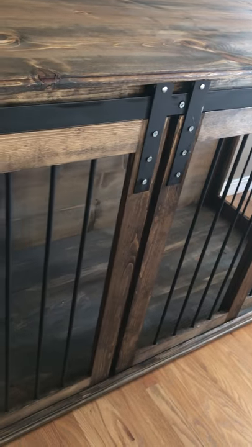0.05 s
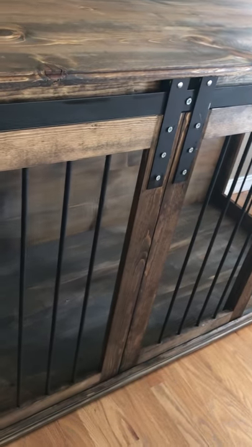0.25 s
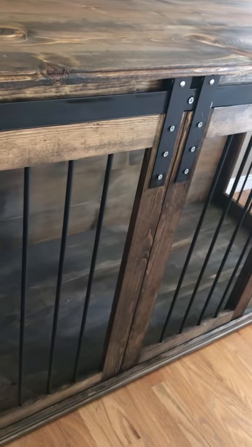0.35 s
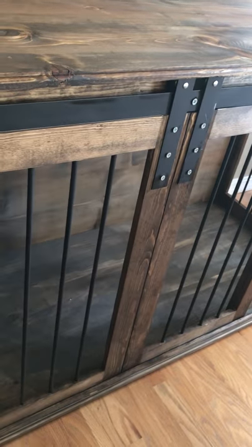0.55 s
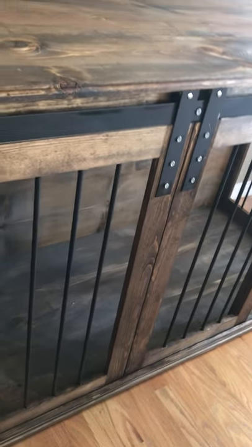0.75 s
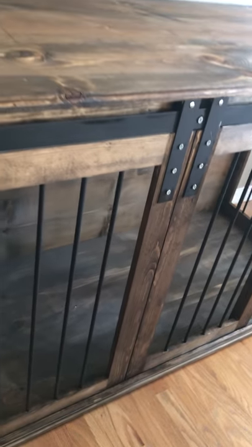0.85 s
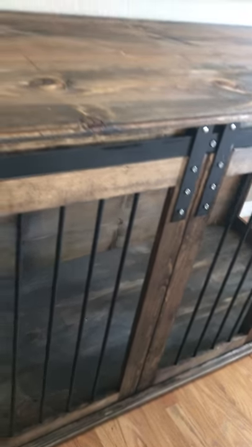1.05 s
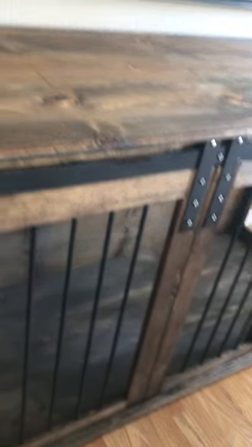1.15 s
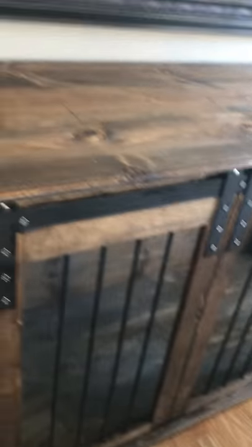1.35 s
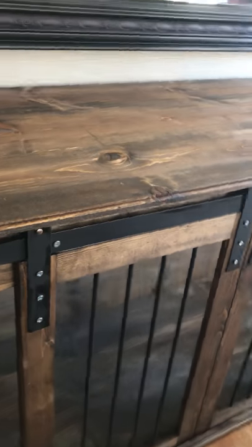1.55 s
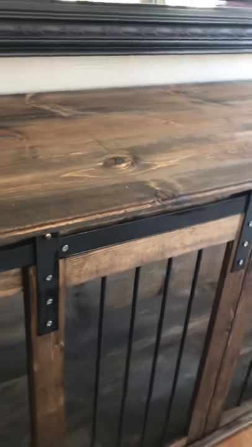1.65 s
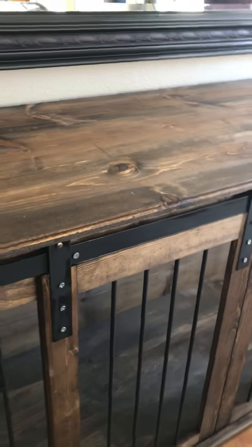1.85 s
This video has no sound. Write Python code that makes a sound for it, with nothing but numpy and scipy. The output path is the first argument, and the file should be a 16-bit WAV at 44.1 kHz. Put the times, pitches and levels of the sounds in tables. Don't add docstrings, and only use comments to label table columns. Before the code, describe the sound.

A wooden sliding cabinet door rolls on a steel rail, gritty crunch swelling from 0 to 0.3 s. Steel touches at 0.29, then a loud wood-and-iron clack at 0.35 and a brighter one at 0.4, booming hollowly. A rebound knocks in a quick cluster around 0.58. Loose metal ticks at 0.77, 0.93, 1.1, 1.27 and 1.5 fade over a faint bar hum, room tone and hiss.

```python
import sys
import numpy as np
from scipy import signal
from scipy.fft import rfft, irfft, next_fast_len
from scipy.io import wavfile
from scipy.ndimage import uniform_filter1d, map_coordinates

SR = 44100
rng = np.random.default_rng(int(sys.argv[2]) if len(sys.argv) > 2 else 0)


def nominal_scale(level):
    x = np.asarray(level, float) / 20
    return 10 ** x


def waveform_to_disk(signal):
    frames = np.transpose(np.atleast_2d(signal))
    scaled = np.clip(frames, -1, 1) * 32767
    samples = np.round(scaled).astype(np.int16)
    wavfile.write(sys.argv[1], SR, samples)


N = 83790

# (frequency [Hz], level per Hz [dB])
BODY_COLOUR = [(25, -7), (70, 1), (130, -1), (190, 2.5), (300, -5), (480, -14), (900, -15.5), (1500, -57)]
# (frequency [Hz], level [dB], t60 [s])
STRAP_MODES = [(742, 1, 0.51), (945, -2, 0.15), (1234, 0, 0.11), (1570, -41, 5.0), (1976, 3.5, 0.12),
               (2650, -38, 0.18), (3000, -44, 0.75), (3730, -11, 0.09), (4270, -32, 0.18),
               (5040, -20, 0.11), (6083, -65, 0.25), (7730, -9, 0.095)]
# (frequency [Hz], level [dB], t60 [s])
HANGER_RING = [(690, -12, .2), (1095, -3, .3), (1287, 0, .3), (1413, -2, .3), (1798, -12, .1),
               (2350, -10, .08), (3100, -16, .08), (3625, -8, .06)]
DOOR_RING_DB, DOOR_RING_S = -23, .08
HANGER_RING_S = .16


def unit(x):
    return x / np.sqrt(np.mean(x ** 2) + 1e-20)


def along(points, hz):
    f, v = np.transpose(points)
    return np.interp(np.log(hz + 1), np.log(f + 1), v)


def curve(rows):
    return np.interp(np.arange(N) / SR, *np.transpose(rows))


def wobble(rate):
    knots = rng.standard_normal(int(N * rate / SR) + 4)
    return map_coordinates(knots, [np.arange(N) * rate / SR])


def filtered(x, response):
    m = next_fast_len(len(x) + 8192)
    return irfft(rfft(x, m) * response(np.fft.rfftfreq(m, 1 / SR)), m)[:len(x)]


def noise(response):
    return unit(filtered(rng.standard_normal(N), response))


def peak(f, hz, width_hz):
    return 1j * f * width_hz / (hz * hz - f * f + 1j * f * width_hz)


def room_answer():
    # (frequency [Hz], t60 [s])
    decay = [(100, 0.93), (500, 0.9), (2000, 0.53), (6000, 0.35), (14000, 0.12)]
    late_db, early_db, early_t60_s, early_top_hz = -3, -4, 0.044, 9100
    hz, t, z = signal.stft(rng.standard_normal(SR), SR, nperseg=256)
    late = signal.istft(z * nominal_scale(-60 * t / along(decay, hz)[:, None]), SR, nperseg=256)[1]
    early = filtered(rng.standard_normal(len(late)), lambda f: 1 / (1 + (f / early_top_hz) ** 2))
    early = early * nominal_scale(-60 * np.arange(len(late)) / SR / early_t60_s)
    answer = nominal_scale(late_db) * late / np.linalg.norm(late) + nominal_scale(early_db) * early / np.linalg.norm(early)
    answer[0] = 1
    return answer


def travelling(dry, until_s):
    t, step_s = np.arange(N) / SR, .05
    wet = 0
    for s in np.arange(0, until_s, step_s):
        share = np.cos(np.pi / 2 * np.clip((t - s) / step_s, -1, 1))
        wet = wet + signal.fftconvolve((dry * share)[:SR // 2], room_answer())[:N]
    return np.pad(wet, (0, N - len(wet)))


def chatter_burst(shape, colour):
    even_hz = 160
    z, hz = rfft(shape * rng.standard_normal(len(shape))), np.fft.rfftfreq(len(shape), 1 / SR)
    power = uniform_filter1d(np.abs(z) ** 2, size=round(even_hz / hz[1]))
    even = z / np.sqrt(np.abs(power) + 1e-12)
    burst = irfft(even * colour(hz), len(shape))
    burst = burst * (np.arange(len(shape)) < len(shape) // 2)
    return unit(burst) * np.sqrt(np.mean(shape ** 2))


def strikes(events, colour, modes, ring_db, longest_s):
    focus_db, focus_width, rise_s = -0.5, 0.36, 0.00041
    snap, snap_t60_s = .8, .01
    out, t = np.zeros(N + 3 * SR), np.arange(SR // 2) / SR
    for s, db, tilt_db, chatter_s, focus_hz in events:
        def lean(f):
            focus = 1 + nominal_scale(focus_db) * abs(peak(f, focus_hz, focus_width * focus_hz))
            return nominal_scale(tilt_db * np.log2((f + 200) / 2500)) * focus

        shape = nominal_scale(-60 * t / max(chatter_s, .002)) + snap * nominal_scale(-60 * t / snap_t60_s)
        crack = chatter_burst(shape, lambda f: nominal_scale(along(colour, f)) * lean(f))
        ring = 0
        for hz, level_db, t60 in modes:
            decay = nominal_scale(level_db + rng.normal(0, 2.1) - 60 * t / min(t60, longest_s))
            ring = ring + decay * lean(hz) * np.sin(2 * np.pi * (hz * t + rng.random()))
        hit = nominal_scale(db - 10) * (crack + nominal_scale(ring_db) * ring) * (1 - np.exp(-t / rise_s))
        wet = signal.fftconvolve(hit, room_answer())
        out[round(s * SR):][:len(wet)] += wet
    return out[:N]


def floor():
    # (frequency [Hz], level per Hz [dB])
    tone_colour = [(25, -20), (60, -6), (200, -1), (330, -11), (1200, -17), (2500, -23), (5000, -27),
                   (10200, -31), (11500, -60)]
    # (frequency [Hz], level per Hz [dB])
    hiss_colour = [(8500, -27), (10300, -9.5), (12000, 3.5), (16500, -5), (17900, -2)]
    # (time [s], level [dB])
    rustle = [(0, 0.5), (1.08, -1.5), (1.14, 3.5), (1.26, 0.5), (1.3, -1.5), (1.5, 0.5), (1.9, -0.5)]
    tone = nominal_scale(-65 + 0.51 * wobble(5.1)) * noise(lambda f: nominal_scale(along(tone_colour, f)))
    drone = nominal_scale(-69) * noise(lambda f: peak(f, 76.5, 76) ** 2)
    hiss = nominal_scale(-79 + curve(rustle)) * noise(lambda f: nominal_scale(along(hiss_colour, f)))
    return tone + drone + hiss


def sway():
    # (time [s], level [dB])
    rocking = [(0, -52.5), (.06, -55.5), (.13, -59), (.27, -43), (.33, -35), (.45, -38), (.55, -46.5),
               (.62, -38.5), (.72, -51), (.82, -54.5), (1.0, -59), (1.2, -68.5), (1.3, -68.5), (1.9, -76)]
    # (time [s], level [dB])
    humming = [(.6, -90), (.72, -55), (.8, -55), (.88, -51.5), (1.025, -51.5), (1.06, -62), (1.1, -59),
               (1.2, -60), (1.3, -90)]
    bar_hz, bar_width_hz = 229.2, 1.8
    rumble = noise(lambda f: nominal_scale(along(BODY_COLOUR, f)))
    blur = noise(lambda f: peak(f, bar_hz, bar_width_hz) ** 2)
    hum = np.sin(2 * np.pi * bar_hz * np.arange(N) / SR + .4 * wobble(5)) + .1 * blur
    return nominal_scale(curve(rocking) + 1.64 * wobble(25.15)) * rumble + nominal_scale(curve(humming)) * hum


def cabinet():
    # (time [s], level [dB], loudest panel [Hz])
    blows = [(.002, -48, 212), (.07, -51.5, 380), (.1, -50.5, 380), (.085, -46.5, 212), (.13, -48.5, 380),
             (.155, -48.5, 380), (0.187, -39.5, 212), (0.237, -37, 283), (0.295, -28, 75), (.297, -29, 180),
             (.303, -34, 283), (.305, -41.5, 540), (.312, -30.5, 212), (0.3212, -24, 212), (.345, -34, 283),
             (.355, -43, 540), (0.361, -33.5, 75), (.366, -29, 283), (.39, -29, 212), (.408, -34.5, 100),
             (.432, -38, 212), (.475, -51, 283), (0.498, -35, 212), (0.576, -34, 180), (.586, -41, 680),
             (.588, -40, 380), (0.597, -27, 180), (0.623, -36, 124), (.66, -43.5, 212), (.67, -43.5, 380),
             (.7, -45.5, 540), (0.706, -43, 212), (.74, -46, 212), (.94, -60, 680), (0.944, -53.5, 540),
             (1.118, -59, 680)]
    # (frequency [Hz], level [dB], t60 [s])
    panels = [(75, 2, 0.49), (100, 8.5, 0.16), (124, 5, 0.22), (180, -9, 0.22), (212, 4.5, .11),
              (283, 2.5, 0.123), (380, 1.5, 0.14), (540, -0.5, 0.086), (680, 3, 0.17)]
    spread_octaves, rise_s, room_db = 0.085, 0.0014, -11.5
    out, t = np.zeros(N + SR), np.arange(SR) / SR
    for s, db, panel_hz in blows:
        ring = 0
        for hz, level_db, t60 in panels:
            nearness = 1 / (1 + (np.log2(hz / panel_hz) / spread_octaves) ** 2) ** 2
            ring = ring + nearness * nominal_scale(level_db - 60 * t / t60) * np.sin(2 * np.pi * hz * t)
        out[round(s * SR):][:len(t)] += nominal_scale(db - 3.5) * ring * (1 - np.exp(-t / rise_s))
    room = room_answer()
    room[1:] *= nominal_scale(room_db)
    return signal.fftconvolve(out, room)[:N]


def last_ticks():
    # (time [s], peak level [dB], tilt [dB/octave], chatter t60 [s], loudest part [Hz])
    touches = [
        (1.2705, -53.5, 0, .06, 1290),
        (1.4965, -58, 0, .06, 1290),
    ]
    # (frequency [Hz], level per Hz [dB])
    dull_colour = [(700, -45), (1050, -16), (1450, -14), (1900, -27), (4000, -36), (17500, -60)]
    return strikes(touches, dull_colour, HANGER_RING, -19, HANGER_RING_S)


def hanger_ticks():
    # (time [s], peak level [dB], tilt [dB/octave], chatter t60 [s], loudest part [Hz])
    ticks = [
        (.7732, -37.5, -5.5, 0.025, 1374),
        (.9290, -32.5, -0.5, 0.032, 5500),
        (.9310, -39, -7.5, 0.065, 1260),
        (1.0968, -38.5, -2.5, 0.022, 5400),
        (1.099, -44.5, -7.5, 0.11, 1280),
    ]
    # (frequency [Hz], level per Hz [dB])
    tick_colour = [(300, -50), (800, -44), (1100, -12.5), (3600, -12), (5800, -17.5), (6600, -24),
                   (12000, -31.5), (17500, -38)]
    return strikes(ticks, tick_colour, HANGER_RING, -21.5, HANGER_RING_S)


def rolling():
    # (time [s], level [dB])
    speed_level = [(0, -75), (.04, -68.5), (.06, -63.5), (.14, -51.5), (.19, -48), (.24, -44),
                   (.285, -43.5)]
    # (frequency [Hz], level per Hz [dB])
    wheel_colour = [(300, -12.5), (500, -13), (900, -7), (1600, -4.5), (3000, -8.5), (5000, -15.5),
                    (13000, -28.5), (17500, -32)]
    # (frequency [Hz], width [Hz], level [dB])
    rail_modes = [(980, 37, -4.5), (1600, 38, -16), (2240, 67, -24), (2900, 160, 4), (5250, 160, 1.5)]
    grit_per_s, grit_scatter_db, grit_share = 1100, 2.5, 0.54
    rail_db, boom_db, end_s, fade_s = -8, -11.5, 0.311, 0.038
    grains = (rng.random(N) < grit_per_s / SR) * rng.choice([-1, 1], N)
    grit = grains * nominal_scale(grit_scatter_db * rng.exponential(size=N))
    drive = grit_share * unit(grit) + rng.standard_normal(N)

    def wheel_on_rail(f):
        ringing = sum(nominal_scale(db - rail_modes[0][2]) * abs(peak(f, hz, width)) for hz, width, db in rail_modes)
        return nominal_scale(along(wheel_colour, f)) * (1 + nominal_scale(rail_db) * ringing)

    crunch = unit(filtered(drive, wheel_on_rail))
    boom = unit(filtered(drive, lambda f: nominal_scale(along(BODY_COLOUR, f))))
    stop = np.clip((end_s + fade_s - np.arange(N) / SR) / fade_s, 0, 1)
    level = nominal_scale(curve(speed_level) - 3.5 + 1.1 * wobble(34.2))
    return travelling((crunch + nominal_scale(boom_db) * boom) * level * stop, .4)


def first_touch():
    # (time [s], peak level [dB], tilt [dB/octave], chatter t60 [s], loudest part [Hz])
    touch = [
        (.2890, -25, 0, 0.04, 2080),
    ]
    # (frequency [Hz], level per Hz [dB])
    tip_colour = [(1000, -42), (1650, -28), (1950, -7), (3500, -11), (7000, -14.5), (13000, -21),
                  (17500, -25)]
    return strikes(touch, tip_colour, STRAP_MODES, DOOR_RING_DB - 8, DOOR_RING_S)


def rebounds():
    # (time [s], peak level [dB], tilt [dB/octave], chatter t60 [s], loudest part [Hz])
    knocks = [
        (.5668, -35.5, -2, 0.072, 3000),
        (.5766, -23.5, 6, 0.027, 4800),
        (.5805, -25.5, 1, 0.033, 2800),
        (.5960, -31.5, -4.5, 0.05, 1880),
        (.617, -37, -9, 0.092, 1220),
    ]
    # (frequency [Hz], level per Hz [dB])
    edge_colour = [(300, -28), (550, -13.5), (1250, -5.5), (3000, -7), (5320, -18.5), (9800, -28.5),
                   (11500, -45), (17500, -54)]
    return strikes(knocks, edge_colour, STRAP_MODES, DOOR_RING_DB, DOOR_RING_S)


def clacks():
    # (time [s], peak level [dB], tilt [dB/octave], chatter t60 [s], loudest part [Hz])
    blows = [
        (.3473, -15.5, 3, 0.027, 2390),
        (.3560, -23, -2, 0.14, 1170),
        (.3956, -22.5, 2, 0.062, 2620),
    ]
    # (frequency [Hz], level per Hz [dB])
    door_colour = [(180, -50), (300, -44), (550, -14.5), (1250, -7.5), (3480, -12), (5320, -16),
                   (12900, -33), (16300, -37), (17500, -59)]
    return strikes(blows, door_colour, STRAP_MODES, DOOR_RING_DB, DOOR_RING_S)


def scene():
    background = floor() + sway() + cabinet()
    hanger = last_ticks() + hanger_ticks()
    door = rolling() + first_touch() + rebounds() + clacks()
    return (background + hanger + door)[None]


def top_cut(x):
    return signal.sosfilt(signal.butter(12, 17950, fs=SR, output="sos"), x)


def record(dry):
    low_hz, top_hz = 44.4, 17960
    mix = filtered(dry[0], lambda hz: (hz < top_hz) * (1j * hz / (low_hz + 1j * hz)) ** 2)[None]
    return top_cut(mix)


dry = scene()
out = record(dry)
waveform_to_disk(out)
```